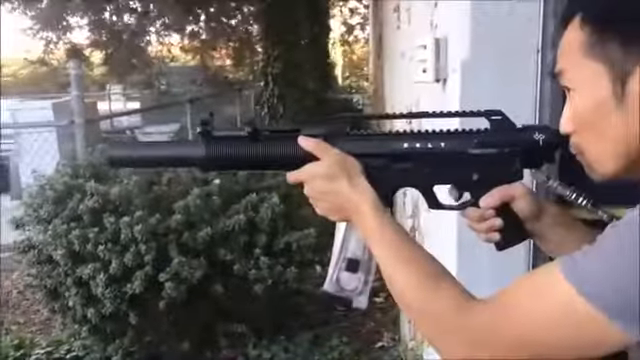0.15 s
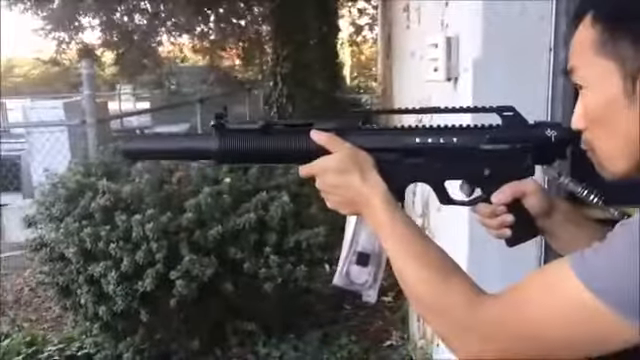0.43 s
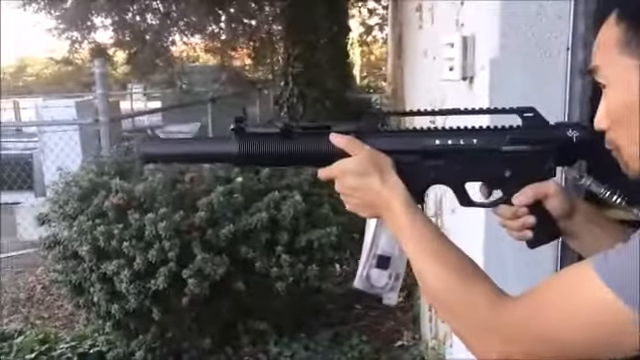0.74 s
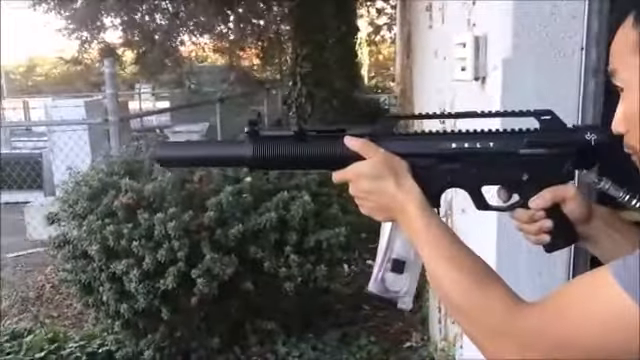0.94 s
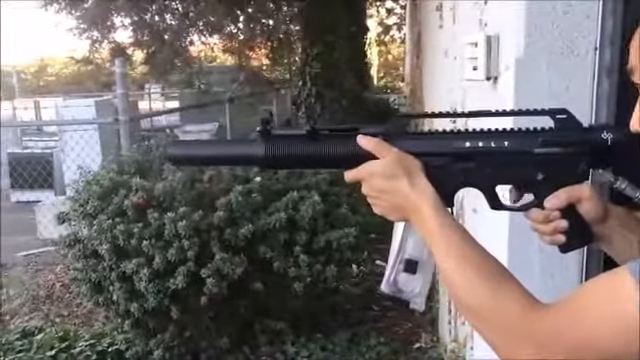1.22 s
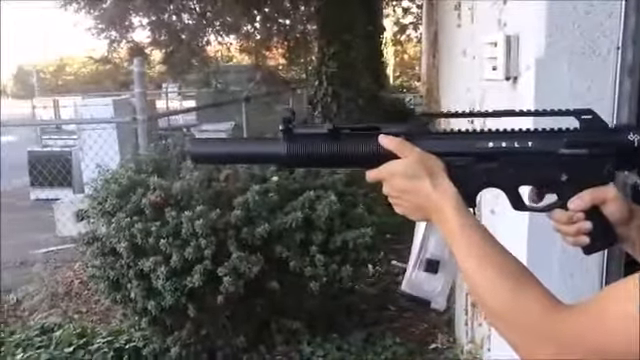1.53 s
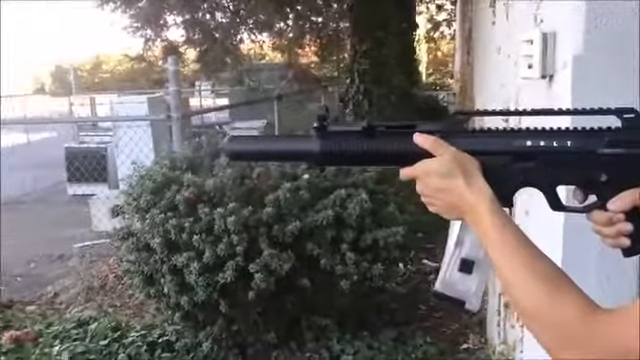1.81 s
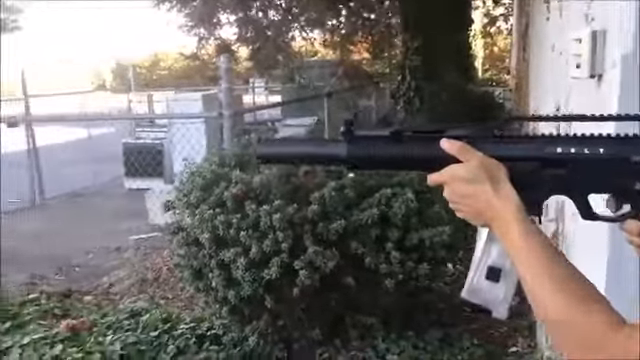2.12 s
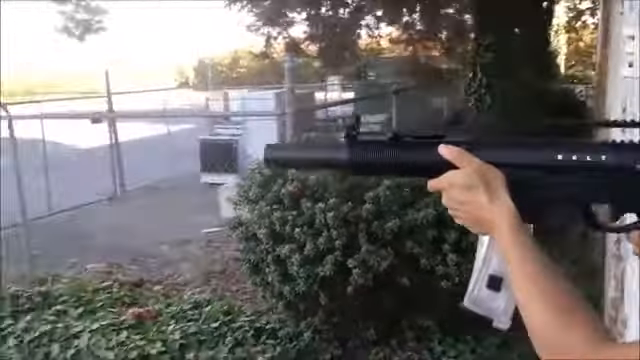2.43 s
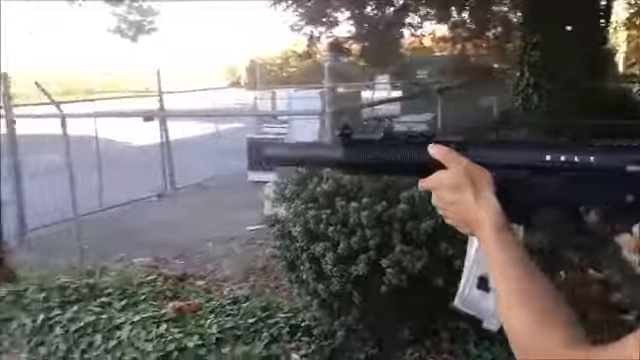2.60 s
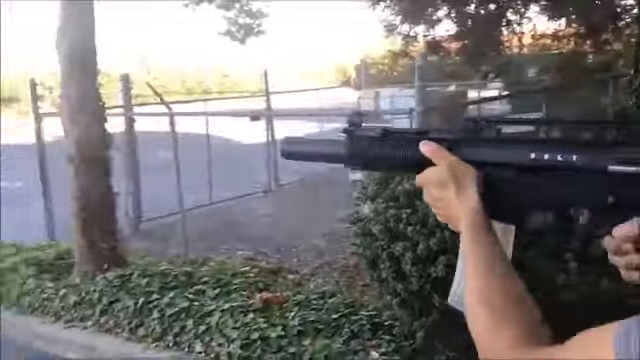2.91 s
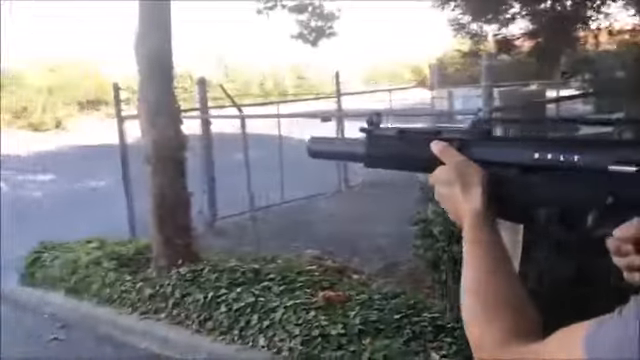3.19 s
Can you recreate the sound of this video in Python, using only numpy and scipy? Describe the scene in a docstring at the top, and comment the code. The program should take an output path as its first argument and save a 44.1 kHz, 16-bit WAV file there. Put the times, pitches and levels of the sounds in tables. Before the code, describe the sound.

A gas-powered paintball marker fires rapidly and evenly from start to end, each shot a click, hard crack and metallic bolt clatter, with short echoes in an open lot, close to a small overloaded microphone.

```python
"""An open lot with distant rumble and hiss, made of shaped noise; a gas-powered paintball marker fires quickly,
close to a small microphone. The first hammer strike falls just before the start, so its sound is under way.
Each later shot: the sear clicks (noise through resonances), the hammer cracks and the barrel pops (short sines),
the bolt is blown back and clatters (noise and ringing steel), and fences and walls answer with a noise tail.
Between shots the trigger often ticks as it resets; some balls thud on a target. Shots overload the input."""
import sys
import numpy as np
from scipy import signal
from scipy.fft import rfft, irfft, next_fast_len
from scipy.io import wavfile
from scipy.ndimage import uniform_filter1d, map_coordinates

SR = 44100
rng = np.random.default_rng(int(sys.argv[2]) if len(sys.argv) > 2 else 0)


def wav_out(sig):
    """Save sig, one row per channel (or a flat mono array), as 16-bit PCM at SR to the path in sys.argv[1]."""
    wavfile.write(sys.argv[1], SR, np.round(np.clip(np.atleast_2d(sig).T, -1, 1) * 32767).astype(np.int16))


N = 147735  # length in samples
LEAD = SR // 10  # samples of room ahead of the start
T = np.arange(SR // 6) / SR  # time within one close sound, seconds

# Open-air background. Each row: frequency in [Hz], relative density in [dB per Hz].
AIR_SPECTRUM = [(18, -38), (30, -8), (88, 2), (249, -26), (1440, -11), (1770, -17), (4310, -23),
                (15500, -39)]
AIR_DB = -40.5

# Hammer strikes. Each row: strike in [s], blast [dB], blow-back [dB], bolt home [dB, on top of blow-back].
HAMMER_STRIKES = [(-.045, -4, -2, 0), (0.2379, -1, -1.5, -6), (0.4182, -0.5, -0.5, 7), (0.5664, 0, 0.5, -5),
                  (0.7428, -1.5, 0.5, 0.5), (0.898, -2.5, 0, 2), (1.0641, -2.5, -2, 7),
                  (1.2327, -1.5, 0, -7), (1.4039, -2, 0.5, 1), (1.5761, -2.5, -1, 3),
                  (1.7465, -2.5, 1.5, -22), (1.9245, -3.5, 0.5, -0.5), (2.0987, -2, -1.5, 0),
                  (2.2713, -1, 0.5, 4.5), (2.4517, -1.5, -2, 7.5), (2.6218, -3, 1, 4),
                  (2.8041, -2.5, 4, -15), (2.9891, -1.5, -1, 6.5), (3.1672, -3.5, 0.5, 2)]
# Level of the mid-band noise at each shot in turn. One column: relative level in [dB].
MID_BAND_LEVELS = [0, 12, 2, 1.5, 3, -2.5, 6, -4.5, 2, -2, -1, 2, 2, 0, 5, -2.5, -6, 4, 0]
# Air in the barrel and shroud, and in the last row a ring of the hammer strike. Each row: pitch in [Hz], level
# [dB], start after the hammer [ms], duration [ms].
SHOT_TONES = [(58.8, -21.5, 3, 28.7), (133.5, -3.5, 5.5, 10.02), (321.5, -9, 4, 12.13),
              (491, -13, 2.5, 14.96), (643, -6, 2, 12.9), (784, -13, 4, 9.7), (1060.5, -10, 2, 9),
              (1355, -9, 2, 10), (1667, -5.5, 3, 7.5), (3100, -10.5, 0.5, 3.95)]
# Receiver body. Each row: resonance in [Hz], width in [Hz], relative level in [dB].
BODY_RESONANCES = [(537, 205, -7), (1300, 305, 2.5), (1675, 385, 2), (3270, 497, -1), (4640, 370, -5),
                   (5390, 750, -6), (8770, 1940, -12), (11950, 1330, -12.5), (14900, 1100, -13.5)]
# Bolt against its stop. Each row: resonance in [Hz], width in [Hz], relative level in [dB].
BOLT_RESONANCES = [(3100, 1400, -3.5), (4510, 460, 4.5), (5830, 2300, 0), (8660, 4100, -1),
                   (12100, 2900, -1.5), (14600, 1600, -8.5)]
# Narrow noise bands at 1.2-1.7 kHz after the blow-back.
# Each row: band centre in [Hz], width in [Hz], relative level in [dB].
MID_BANDS = [(1180, 104, -3), (1340, 70, 2), (1684, 105, -1)]
# Thin steel parts that ring on. One column: pitch in [Hz].
STEEL_PITCHES = [1520, 9050, 11530]
# The same steel parts, in the same order. Each row: typical level in [dB], 60 dB decay time in [s].
STEEL_DECAYS = [(-38, 0.23), (-31, 0.097), (-47, 0.19)]
BARREL_SCATTER_DB, STEEL_SCATTER_DB = 1.24, 7
HAMMER_DB, HAMMER_T60_S, JET_DB, JET_HOLD_S = -2, 0.022, -12.5, 0.013
# Bolt times are seconds after the hammer; scatter is a standard deviation.
BACK_S, BACK_SCATTER_S, BACK_DB, BACK_T60_S = 0.0153, 0.0004, -6.5, 0.024
HOME_S, HOME_SCATTER_S, HOME_DB, HOME_T60_S = 0.023, 0.0008, -13.5, 0.025
RATTLE_DB, RATTLE_HOLD_S, RATTLE_T60_S = -12, 0.0062, 0.053
MID_BAND_DB, MID_BAND_T60_S = -18, 0.044

# Echoes of the lot. Each row: frequency in [Hz], 60 dB decay time in [s].
LOT_DECAY = [(100, 0.27), (500, 0.38), (2000, 0.32), (8000, 0.4), (15000, 0.17)]
# Tone of those echoes. Each row: frequency in [Hz], relative level in [dB].
LOT_COLOUR_POINTS = [(60, -5), (250, -5), (600, -3.5), (900, -1.5), (1500, -3.5), (2400, 3), (3300, -2),
                     (5000, 0), (10000, 1.5), (15000, 6)]
LOT_DB, ECHO_PATCH_DB = -12, 2.5

# Trigger resets. Each row: start in [s], relative level in [dB].
TRIGGER_RESETS = [(0.054, -21), (0.2055, -18.5), (0.497, -16), (0.6655, -16), (0.825, -10), (1.0074, -16.5),
                  (1.3409, -23), (1.489, -8.5), (1.6706, -14), (2.0093, -21), (2.1928, -11.5),
                  (2.3654, -12.5), (2.5388, -10), (2.7242, -11.5), (2.903, -10), (3.09, -10.5),
                  (3.2761, -11)]
# Trigger parts. Each row: resonance in [Hz], width in [Hz], relative level in [dB].
TRIGGER_RESONANCES = [(2460, 1500, 8), (5200, 1300, 9), (8950, 3600, 4), (13500, 3000, 3.5)]
RESET_DB, RESET_T60_S = -12, 0.012

# Sear releases. Each row: end of the click's rise in [s], relative level in [dB].
SEAR_RELEASES = [(0.2205, 7), (0.402, 1), (0.5496, 1), (0.727, 0), (0.8815, -1), (1.0479, -2), (1.2162, 0),
                 (1.3882, -0.5), (1.5609, -2.5), (1.7318, 0), (1.9094, 0), (2.0831, -2), (2.257, -2),
                 (2.4357, -3.5), (2.6071, -1.5), (2.7902, -0.5), (2.9751, -1), (3.1526, -4.5), (3.3424, -2)]
# Sear and trigger parts. Each row: resonance in [Hz], width in [Hz], relative level in [dB].
SEAR_RESONANCES = [(1980, 1000, 8.5), (3670, 400, 10.5), (4790, 1670, 5.5), (9450, 3000, -20.5),
                   (12300, 3300, -12.5)]
SEAR_DB, SEAR_RISE_S, SEAR_HOLD_S, SEAR_T60_S = -14.5, 0.000986, 0.0019, 0.021
PULL_S, PULL_DB, SLIDE_DB = 0.005, -11, -15.5  # scrape and slide levels are relative to the click

# Balls landing. Each row: landing in [s], relative splat level in [dB], relative thud level in [dB].
BALL_LANDINGS = [(0.34, -8, -24), (0.6747, -11, -25.5), (1.1863, -5.5, -26.5), (1.3419, -11, -32.5),
                 (1.8396, -14, -27.5), (2.5384, -17, -30.5), (2.887, -9.5, -23.5), (3.044, -10, -27)]
# Hollow target. Each row: resonance in [Hz], width in [Hz], relative level in [dB].
TARGET_RESONANCES = [(123, 53, -1), (236, 49, 0), (300, 54, 0.5), (460, 136, -11.5)]
# Wet splat. Each row: resonance in [Hz], width in [Hz], relative level in [dB].
SPLAT_RESONANCES = [(890, 430, -4.5), (1780, 1000, -1), (2660, 960, -1), (5100, 3000, -10)]
THUD_DB, THUD_T60_S, SPLAT_DB, SPLAT_T60_S = 1.5, 0.15, -10.5, 0.062
KNOCK_DB, KNOCK_T60_S = 4.5, 0.043  # first swing of the target's face, relative to the thud

GRIT_DB, GRIT_PER_S = 2.5, 1500  # noise comes in uneven little bursts
CLIP_TOP, CLIP_HARD = 0.97, 10  # ceiling in full scale, sharpness of the knee
LOW_HZ, TOP_HZ = 12, 16200


def amp(db):
    """Turn decibels into gain."""
    return 10 ** (np.asarray(db) / 20)


def along(points, hz):
    """Read a curve of (Hz, value) points along a log frequency axis."""
    f, value = np.transpose(points)
    return np.interp(np.log(hz + 1), np.log(f + 1), value)


def filtered(x, response):
    """Pass x through a complex response of frequency."""
    m = next_fast_len(x.shape[-1] + SR // 20)
    spectrum = rfft(x, m) * response(np.fft.rfftfreq(m, 1 / SR))
    return irfft(spectrum, m)[..., :x.shape[-1]]


def shape(start, rise, hold, t60):
    """Linear attack, hold, and exponential release; all times in seconds."""
    t = T - start
    release = np.maximum(t - rise - hold, 0)
    return np.clip(t / rise, 0, 1) * amp(-60 * release / t60)


def add(track, s, sound):
    """Mix a sound in at s seconds, on a track that begins a little early."""
    i = LEAD + round(s * SR)
    track[..., i:i + sound.shape[-1]] += sound


def air():
    """Distant rumble and hiss: steady noise shaped by the background spectrum."""
    x = filtered(rng.standard_normal(N), lambda hz: amp(along(AIR_SPECTRUM, hz)))
    return amp(AIR_DB) * x / x.std()


def gritty_noise(resonances):
    """Fresh noise with an uneven level, passed through resonances and brought to rms 1."""
    def response(f):
        total = 0
        for k, (centre, width, db) in enumerate(resonances):
            band = 1j * f * width / (centre ** 2 - f ** 2 + 1j * f * width)
            total = total + (-1) ** k * amp(db) * band  # neighbours alternate in sign
        return total

    grit = map_coordinates(rng.standard_normal(len(T)), [T * GRIT_PER_S], order=1)
    x = filtered(rng.standard_normal(len(T)) * amp(GRIT_DB * grit), response)
    return x / x.std()


def barrel():
    """Short tones swell and die at each shot, the air in the barrel and shroud and a ring of the hammer, nearly
    the same at every shot."""
    out = 0
    for hz, db, start, lasts in SHOT_TONES:
        t = T - start / 1000
        swell = np.sin(np.pi * np.clip(1000 * t / lasts, 0, 1)) ** 0.5
        level = amp(db + BARREL_SCATTER_DB * rng.standard_normal())
        out = out + level * swell * np.sin(2 * np.pi * hz * t)
    return out


def steel_ring(start):
    """Thin steel parts ring as decaying sines, struck differently at each blow."""
    t = np.maximum(T - start, 0)
    out = 0
    for hz, (db, t60) in zip(STEEL_PITCHES, STEEL_DECAYS):
        struck_db = db + STEEL_SCATTER_DB * rng.standard_normal()
        out = out + amp(struck_db - 60 * t / t60) * np.sin(2 * np.pi * hz * t)
    return out


def bolt(home_db, mid_db):
    """The bolt hits its stop, rattles the body, rings steel, with mid-band noise, and comes home."""
    back_s = BACK_S + BACK_SCATTER_S * rng.standard_normal()
    home_s = HOME_S + HOME_SCATTER_S * rng.standard_normal()
    stop = amp(BACK_DB) * shape(back_s, 0.00041, 0.0011, BACK_T60_S)
    home = amp(HOME_DB + home_db) * shape(home_s, 0.00055, 0.001, HOME_T60_S)
    rattle = amp(RATTLE_DB) * shape(BACK_S, 0.0022, RATTLE_HOLD_S, RATTLE_T60_S)
    mid_band = amp(MID_BAND_DB + mid_db) * shape(BACK_S, 0.0036, 0.0078, MID_BAND_T60_S)
    out = stop * gritty_noise(BOLT_RESONANCES) + (rattle + home) * gritty_noise(BODY_RESONANCES)
    return out + steel_ring(BACK_S) + mid_band * gritty_noise(MID_BANDS)


def shot(blast_db, back_db, home_db, mid_db):
    """Hammer crack and gas jet shake the body as the barrel pops; then the bolt cycles."""
    hammer = amp(HAMMER_DB) * shape(0, 0.00081, 0.00033, HAMMER_T60_S)
    jet = amp(JET_DB) * shape(0, 0.00056, JET_HOLD_S, 0.0045)
    blast = barrel() + (hammer + jet) * gritty_noise(BODY_RESONANCES)
    return amp(blast_db) * blast + amp(back_db) * bolt(home_db, mid_db)


def lot(x):
    """The answer of fences and walls: a decaying noise tail, patchy and new for every shot."""
    hz, t, z = signal.stft(rng.standard_normal(SR // 3), SR, nperseg=256)
    patch = uniform_filter1d(rng.standard_normal(z.shape), size=12, axis=0)  # across frequency
    patch = uniform_filter1d(patch, size=4, axis=1)  # across time
    colour = along(LOT_COLOUR_POINTS, hz)[:, None]
    decay = 60 * t / along(LOT_DECAY, hz)[:, None]
    db = colour - decay + ECHO_PATCH_DB * patch / patch.std()
    tail = signal.istft(z * amp(db), SR, nperseg=256)[1]
    return amp(LOT_DB) * signal.fftconvolve(x, tail / np.linalg.norm(tail))


def shots(track):
    """Each shot reaches the microphone close, and by way of the lot."""
    out = np.zeros_like(track)
    for (s, *levels_db), mid_db in zip(HAMMER_STRIKES, MID_BAND_LEVELS):
        close = shot(*levels_db, mid_db)
        add(out, s, close)
        add(out, s, lot(close))
    return out


def trigger_ticks(track):
    """The trigger resets with a short tick of its small parts."""
    out = np.zeros_like(track)
    for s, db in TRIGGER_RESETS:
        tick = shape(0, 0.00036, 0.00072, RESET_T60_S) * gritty_noise(TRIGGER_RESONANCES)
        add(out, s, amp(db + RESET_DB) * tick)
    return out


def sear_clicks(track):
    """The trigger scrapes just before the sear lets go, then click and slide ring the parts."""
    out = np.zeros_like(track)
    for s, db in SEAR_RELEASES:
        scrape = amp(PULL_DB) * shape(0, PULL_S, 0.0004, 0.0071) ** 2
        click = shape(PULL_S, SEAR_RISE_S, SEAR_HOLD_S, SEAR_T60_S)
        slide = amp(SLIDE_DB) * shape(PULL_S, 0.0034, 0.011, 0.016)
        sound = amp(db + SEAR_DB) * (scrape + click + slide) * gritty_noise(SEAR_RESONANCES)
        add(out, s - SEAR_RISE_S - PULL_S, sound)
    return out


def target(track):
    """A ball bursts on something hollow: a dull splat, a struck face, a rumbling after-thud."""
    out = np.zeros_like(track)
    face_hz = TARGET_RESONANCES[1][0]
    for s, splat_db, thud_db in BALL_LANDINGS:
        knock = amp(KNOCK_DB - 60 * T / KNOCK_T60_S) * np.sin(2 * np.pi * face_hz * T)
        thud = shape(0.00081, 0.00077, 0.0017, THUD_T60_S) * gritty_noise(TARGET_RESONANCES)
        burst = shape(0, 0.00048, 0.00077, SPLAT_T60_S) * gritty_noise(SPLAT_RESONANCES)
        splat = filtered(burst, lambda hz: 1 / (1 + 1j * hz / 4000) ** 2)  # dulled above 4 kHz
        add(out, s, amp(thud_db + THUD_DB) * (knock + thud) + amp(splat_db + SPLAT_DB) * splat)
    return out


def scene():
    """Everything at the microphone, as one channel."""
    track = np.zeros(LEAD + N + SR)
    events = shots(track) + trigger_ticks(track) + sear_clicks(track) + target(track)
    return (events[LEAD:LEAD + N] + air())[None]


def record(dry):
    """The overloaded input clips with a rounded knee; then the bass and band limits."""
    clipped = dry / (1 + np.abs(dry / CLIP_TOP) ** CLIP_HARD) ** (1 / CLIP_HARD)
    return filtered(clipped, lambda hz: (hz < TOP_HZ) * 1j * hz / (LOW_HZ + 1j * hz))


dry = scene()
out = record(dry)
wav_out(out)
```